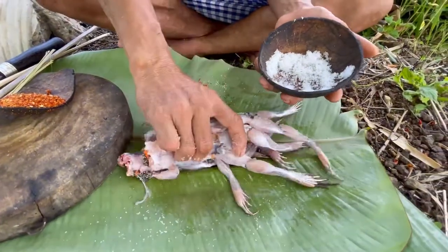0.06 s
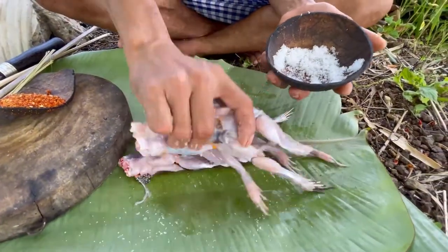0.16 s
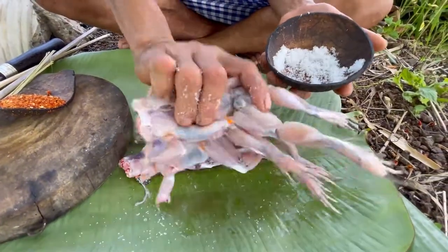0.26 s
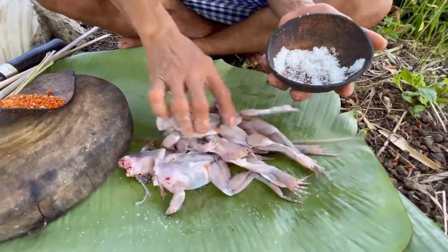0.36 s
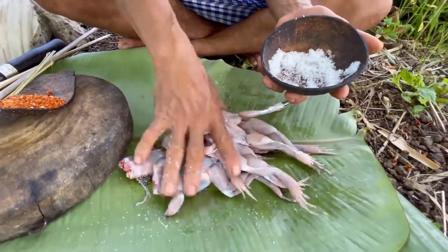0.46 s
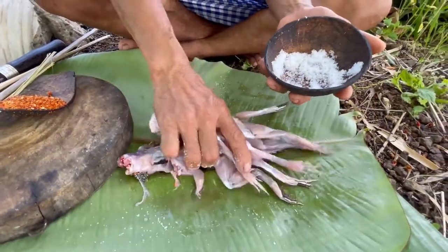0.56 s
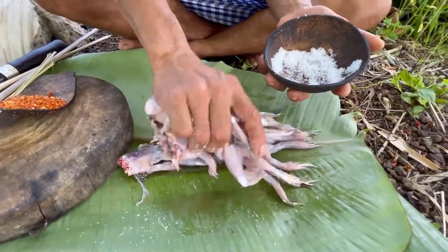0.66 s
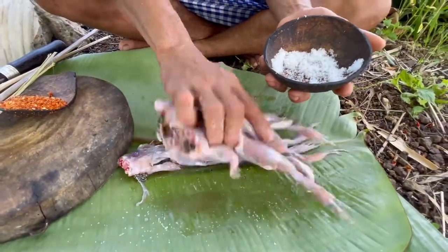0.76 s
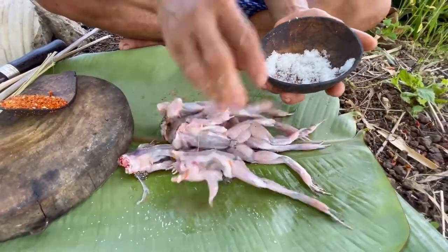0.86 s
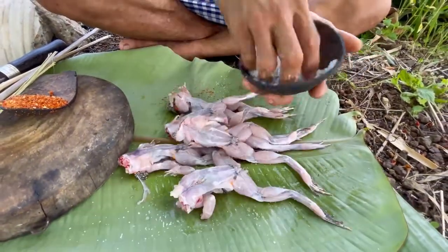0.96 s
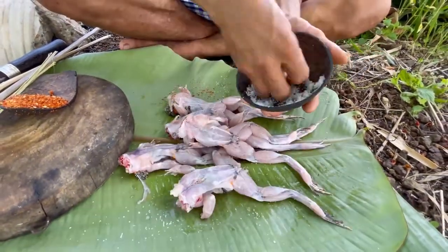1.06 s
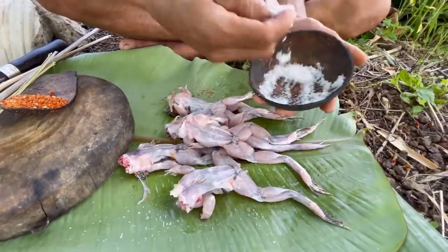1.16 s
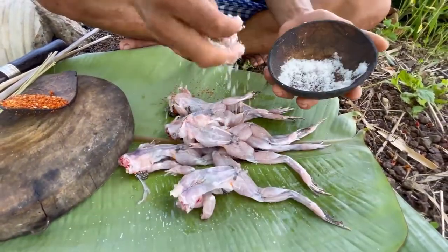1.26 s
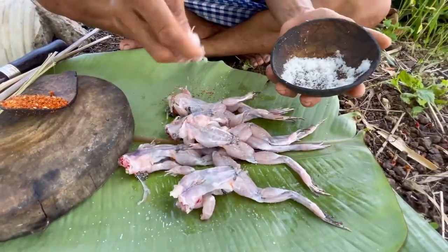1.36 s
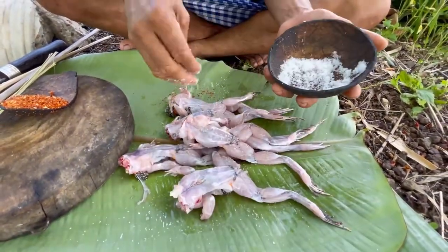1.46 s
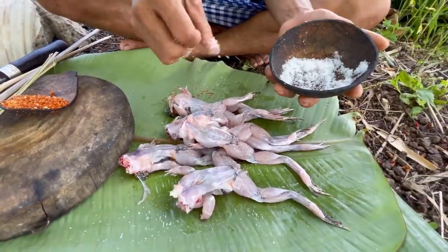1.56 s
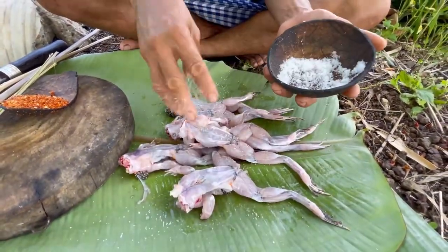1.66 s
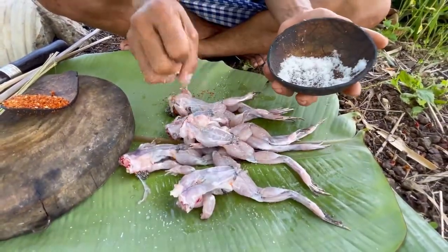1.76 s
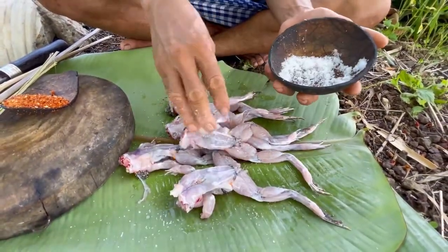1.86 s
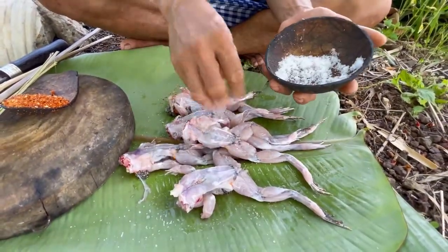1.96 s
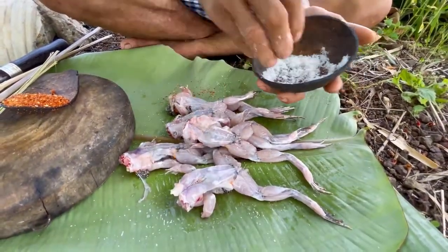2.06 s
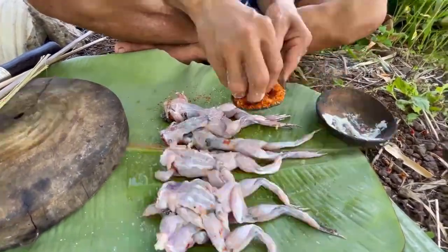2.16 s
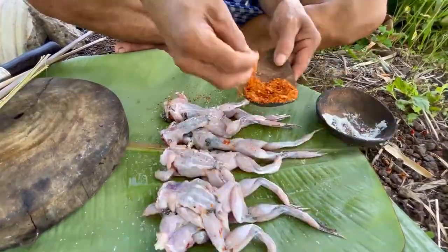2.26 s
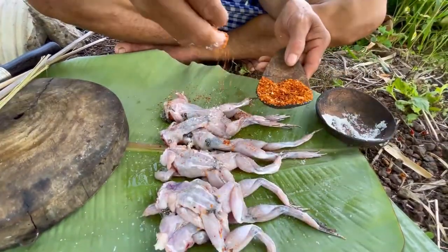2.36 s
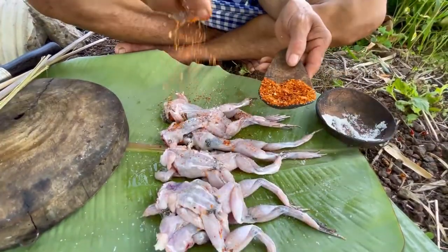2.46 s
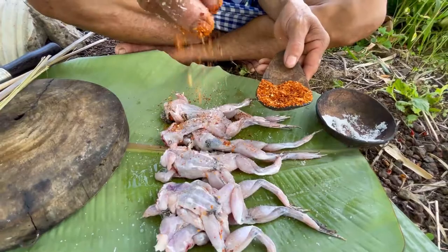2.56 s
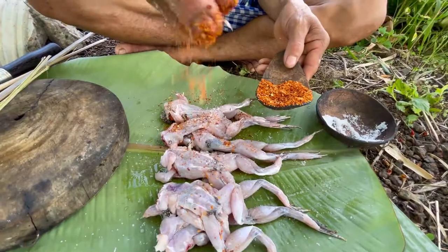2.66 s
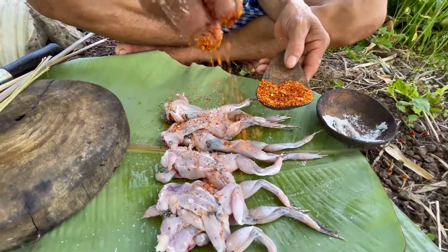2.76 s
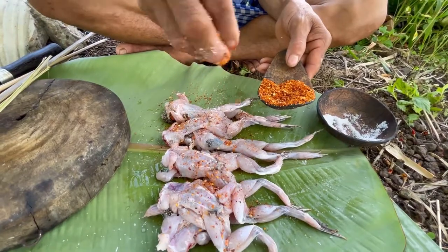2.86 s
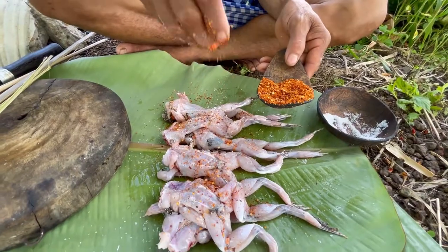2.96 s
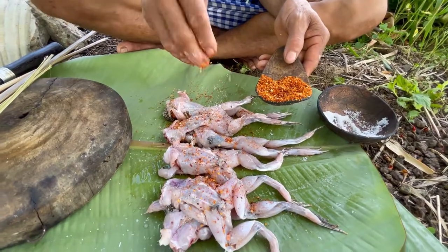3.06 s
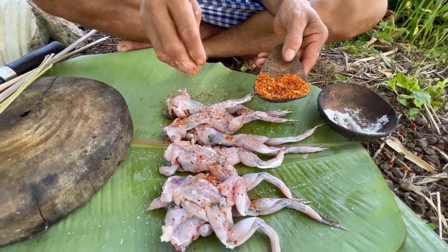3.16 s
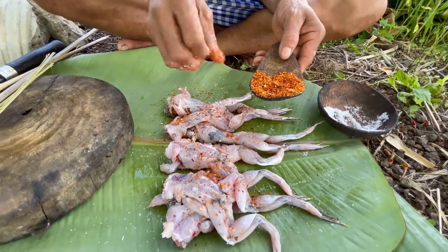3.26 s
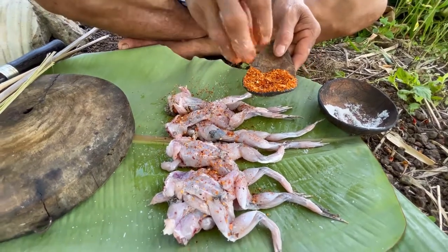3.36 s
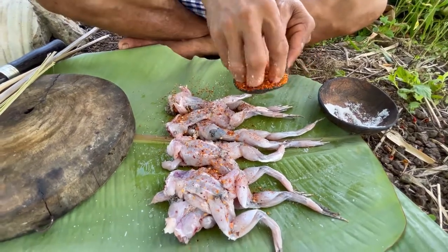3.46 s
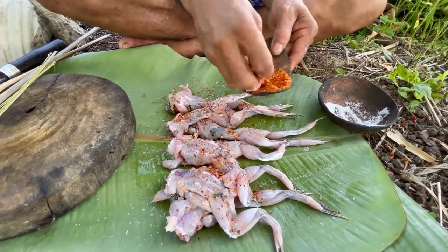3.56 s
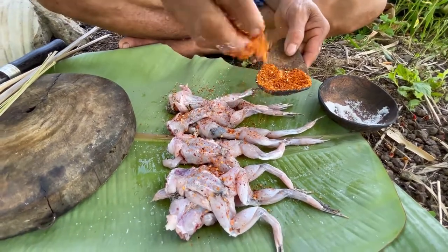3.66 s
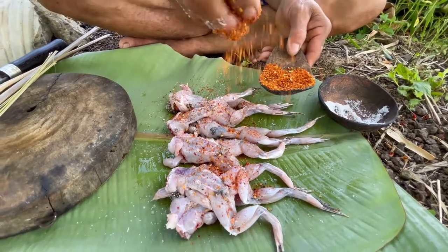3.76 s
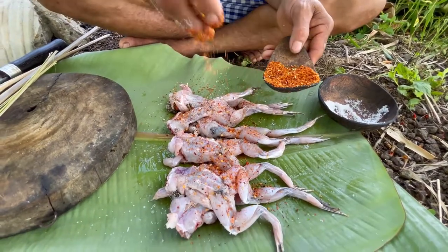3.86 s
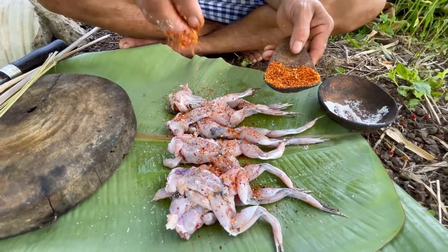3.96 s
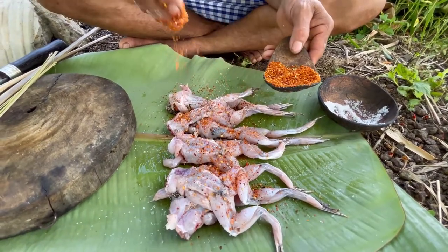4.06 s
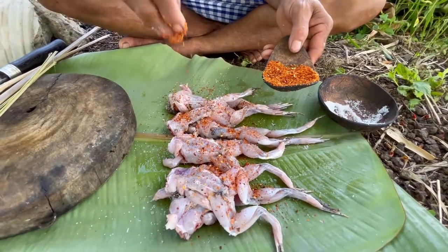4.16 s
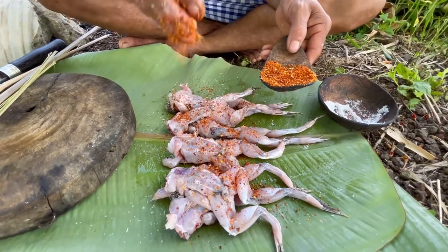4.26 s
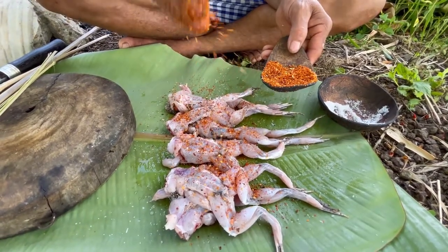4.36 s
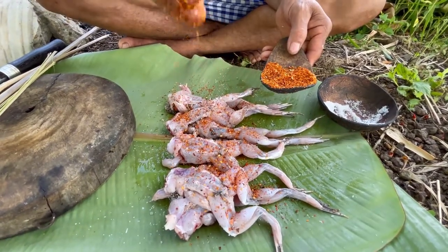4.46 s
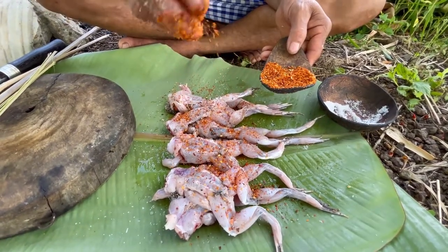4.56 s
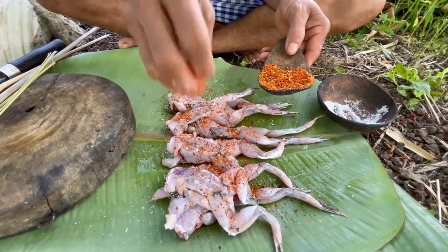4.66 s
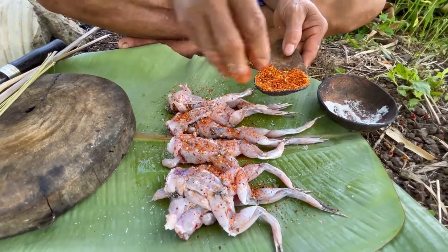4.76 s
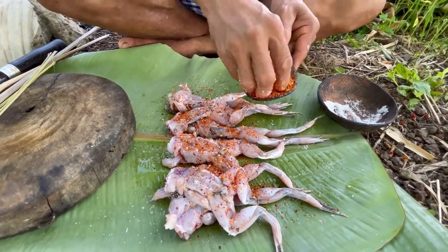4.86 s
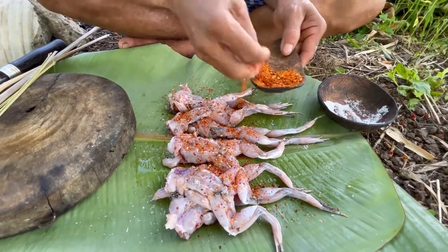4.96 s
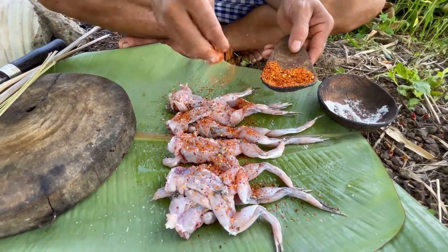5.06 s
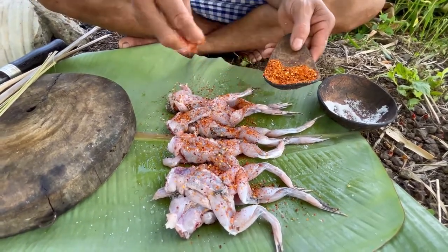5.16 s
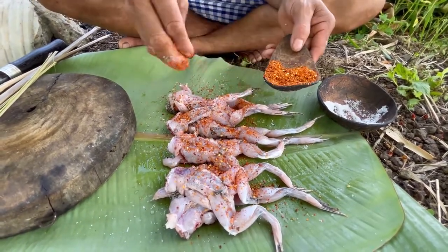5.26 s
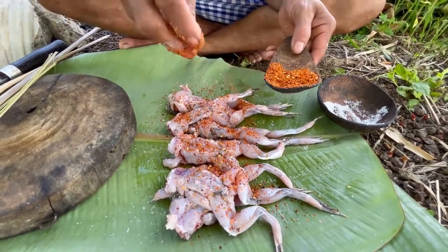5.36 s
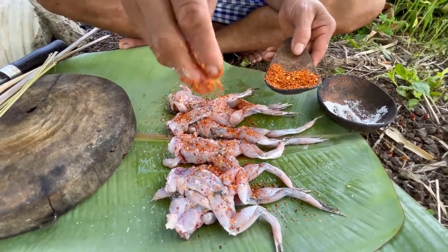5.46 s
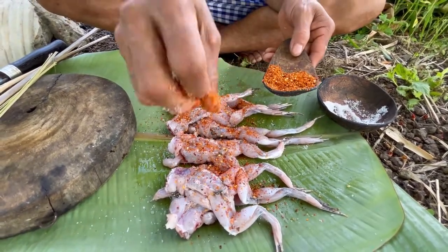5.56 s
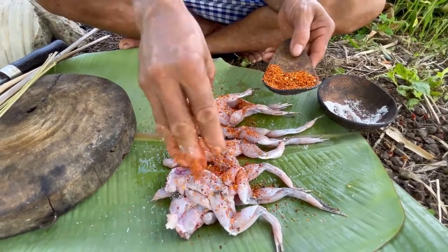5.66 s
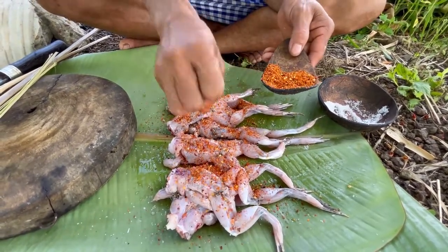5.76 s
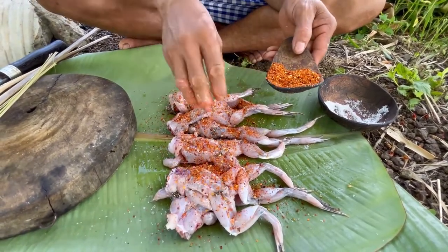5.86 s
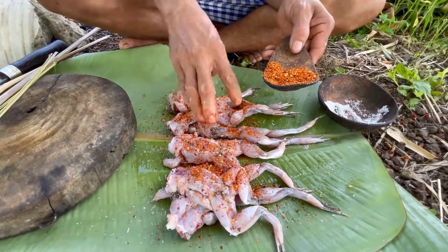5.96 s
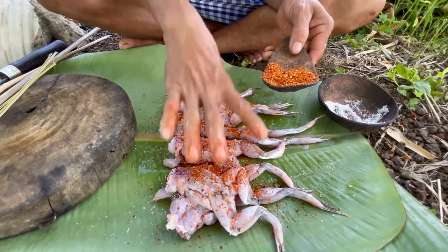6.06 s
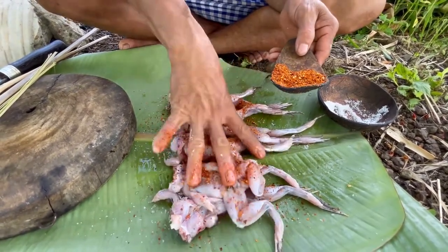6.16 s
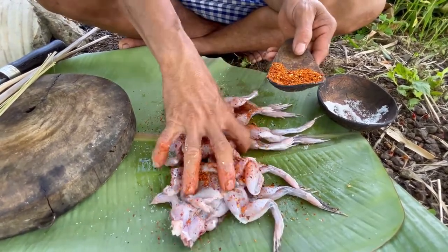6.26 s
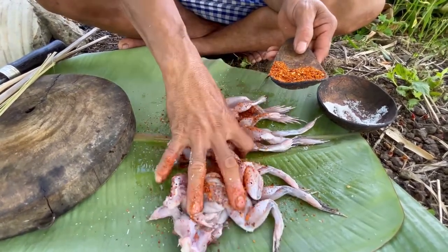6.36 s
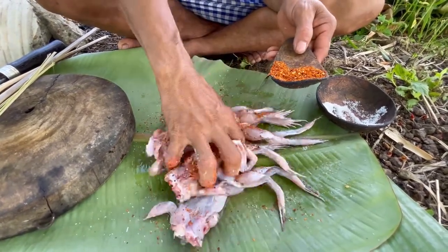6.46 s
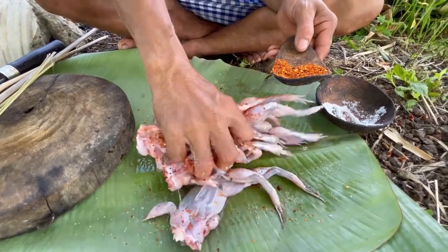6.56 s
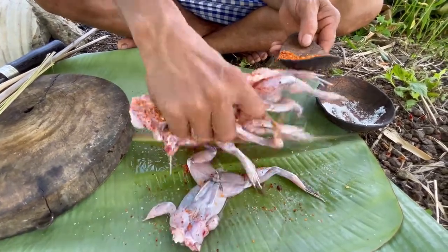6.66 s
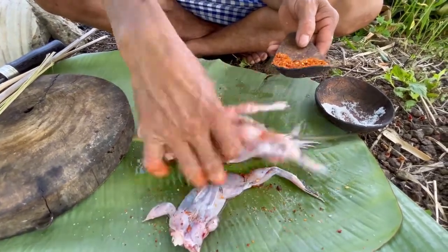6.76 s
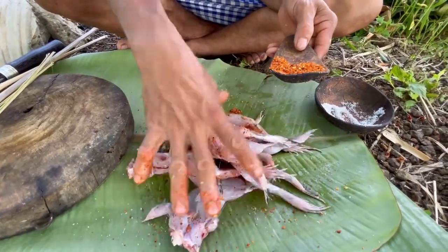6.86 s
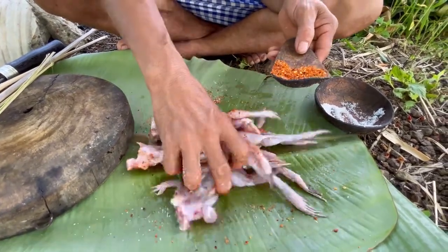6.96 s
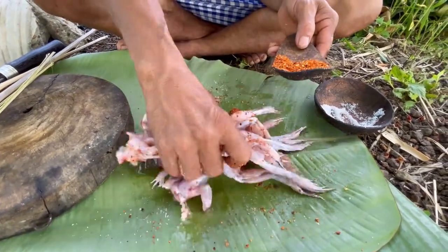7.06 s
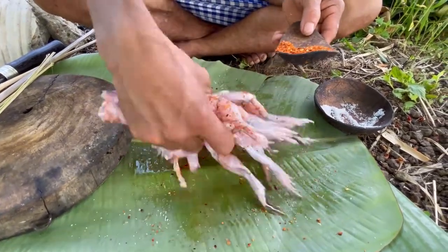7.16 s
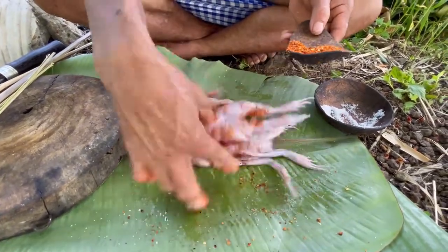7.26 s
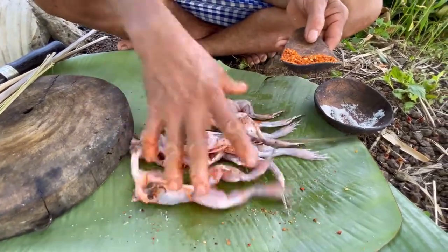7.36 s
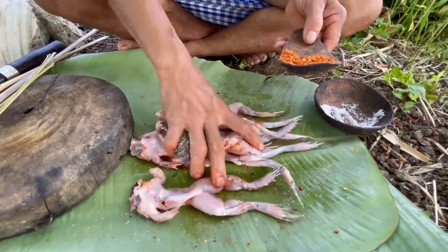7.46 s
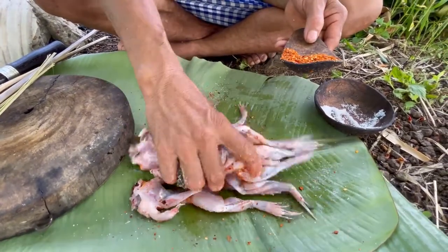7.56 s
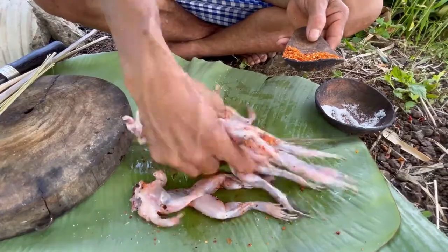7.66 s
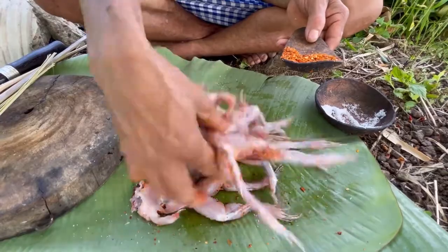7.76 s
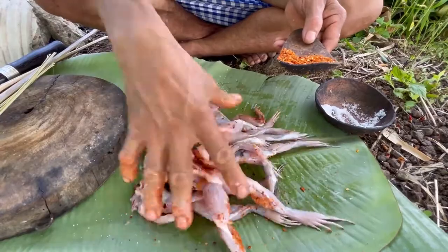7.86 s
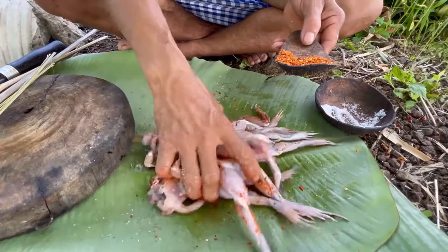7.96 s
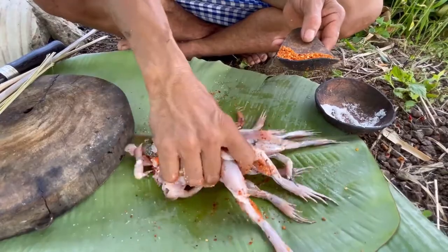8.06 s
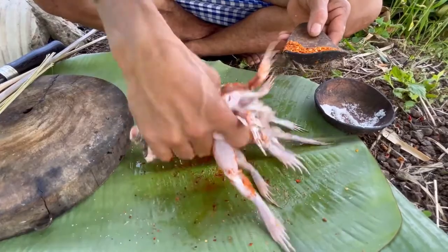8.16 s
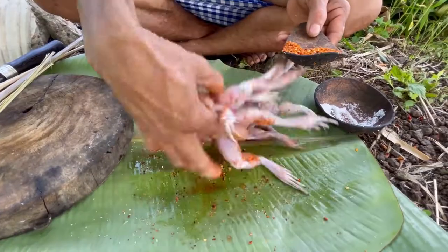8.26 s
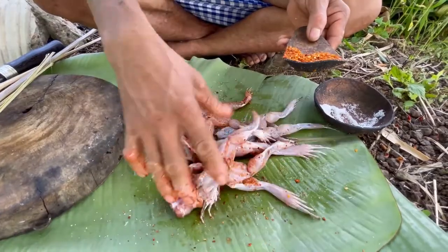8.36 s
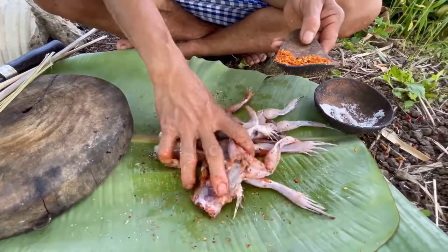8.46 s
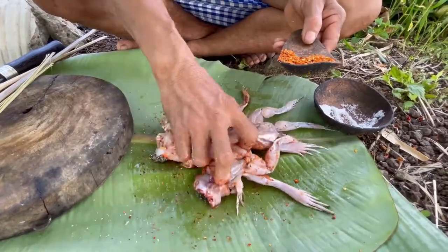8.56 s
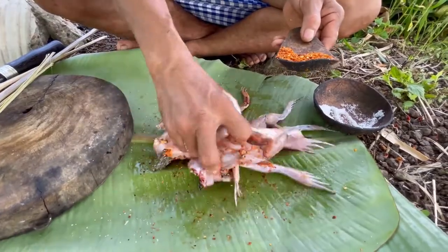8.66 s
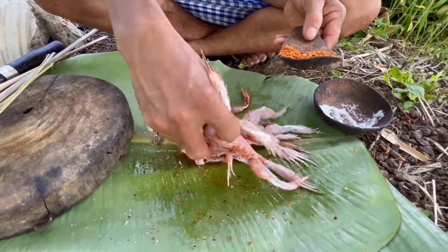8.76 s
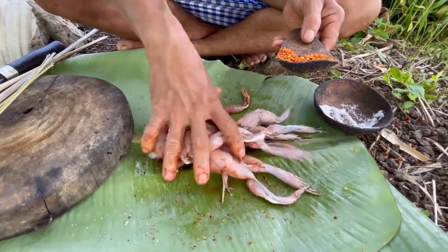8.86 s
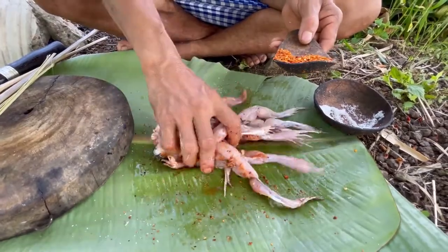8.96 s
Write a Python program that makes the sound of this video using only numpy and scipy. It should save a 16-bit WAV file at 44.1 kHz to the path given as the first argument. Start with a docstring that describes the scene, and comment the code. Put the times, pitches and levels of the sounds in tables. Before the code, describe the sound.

Close outdoor food handling: sticky flesh smacks on a broad leaf, dry salt scrapes, fine pattering flakes, then vigorous wet tossing over faint engine chug.

```python
"""Wet squelches, a splat and a loud pop come first: outdoors, a hand turns raw frogs on a big leaf.
It sprinkles them with salt and chilli flakes, then tosses them again; salt is pinched from a bowl.
Skin, grit and scrapes are crackling coloured noise; air pops are gliding tones; grains are short bursts.
A close two-port microphone hears it over a low filtered-noise rumble and the pulsed chug of a far engine."""
import sys
import numpy as np
from scipy import signal
from scipy.fft import rfft, irfft
from scipy.io import wavfile
from scipy.ndimage import uniform_filter1d

SR = 44100
rng = np.random.default_rng(int(sys.argv[2]) if len(sys.argv) > 2 else 0)


def unload_wav(signal):
    """Save mono or channel-first audio to the path in sys.argv[1] as 16-bit WAV at rate SR, clipped to [-1, 1]."""
    wavfile.write(
        sys.argv[1],
        SR,
        np.round(np.clip(np.atleast_2d(signal).T, -1, 1) * 32767).astype(np.int16),
    )


N = 396900
TIME = np.arange(N) / SR

# All levels are relative, ahead of the echo, the placing and the microphone.
# the hand grips, presses and turns the wet frogs: start_s, length_s, squelch_db, grit_db
GRIPS = [(0.0, .11, -54.5, -49.5), (0.136, 0.11, -58.5, -58), (0.321, .08, -49, -49),
         (0.487, 0.19, -53.5, -48), (0.79, .11, -51, -54), (6.128, 0.12, -52, -48.5),
         (6.235, 0.18, -55, -55.5), (6.399, 0.22, -48, -44), (6.735, 0.12, -47.5, -44),
         (6.913, .21, -47, -43.5), (7.14, 0.33, -55, -50.5), (7.419, 0.3, -48.5, -44),
         (7.775, 0.09, -43.5, -45.5), (7.93, 0.23, -44.5, -43), (8.246, 0.13, -47.5, -43.5),
         (8.444, 0.12, -49, -47), (8.626, .13, -51.5, -47.5), (8.833, 0.45, -49.5, -49.5)]
# the fingers rub a pinch and a shower of salt or flakes falls: start_s, length_s, grit_db
SHOWERS = [(1.334, .11, -56), (1.519, 0.034, -50.5), (1.706, 0.081, -50), (1.851, 0.072, -49),
           (1.923, 0.24, -60.5), (2.327, 0.12, -53.5), (2.475, 0.11, -51), (2.678, 0.051, -54),
           (2.812, 0.098, -50.5), (2.924, 0.06, -63.5), (3.091, 0.16, -53), (3.31, 0.23, -62),
           (3.608, 0.071, -61), (3.711, 0.12, -53.5), (3.84, 0.071, -50.5), (4.105, .025, -56.5),
           (4.373, 0.099, -58), (4.482, 0.065, -52.5), (4.753, 0.046, -60.5), (4.929, 0.094, -62.5),
           (5.06, 0.13, -57.5), (5.207, 0.032, -59.5), (5.359, 0.052, -59.5), (5.69, 0.094, -52.5),
           (5.824, 0.21, -55.5)]
# the largest air pockets popping between wet flesh and leaf: start_s, level_db, nominal pitch_hz
AIR_POPS = [(0.341, -26.5, 1220), (0.3492, -18, 1290), (0.3528, -5, 1750), (0.3728, -20, 1390),
            (0.5089, -31.5, 1580), (0.8289, -22.5, 1510), (0.8398, -22.5, 1700), (0.9806, -28.5, 1980),
            (2.886, -37.5, 1600), (4.4225, -31, 1370), (6.2215, -27.5, 1800), (6.5003, -27, 1680),
            (6.54, -26, 1550), (6.815, -14, 1410), (6.8263, -26, 1100), (7.0522, -19, 1270),
            (7.228, -26.5, 1690), (7.2914, -4, 1820), (7.3039, -12, 1270), (7.3146, -15, 1380),
            (7.4223, -22.5, 1400), (7.5729, -23.5, 1470), (7.5945, -26.5, 2570), (7.635, -25, 2720),
            (7.7681, -25.5, 1190), (7.7923, -22, 1840), (7.848, -23, 1310), (7.8623, -25, 1480),
            (8.2793, -17.5, 2460), (8.311, -17, 1490), (8.3424, -11.5, 1340), (8.3533, -12, 1880),
            (8.9787, -28, 1100)]
# flesh landing on the leaf: start_s, length_s, squelch_db, spray_db
FLESH_SLAPS = [(.338, 0.04, -31, -35.5), (.376, .029, -46, -44), (.824, 0.023, -34.5, -40),
               (.842, 0.02, -42, -43.5), (6.536, 0.0084, -37.5, -40.5), (6.795, 0.045, -38, -43.5),
               (7.050, .0048, -26, -36), (7.293, 0.051, -34, -37), (7.416, 0.011, -35.5, -46),
               (7.766, 0.0062, -35.5, -42), (7.826, 0.044, -40.5, -43), (8.279, .0088, -44.5, -38),
               (8.330, 0.036, -36.5, -36.5), (8.353, 0.0051, -48, -32)]
# the clearest single grains and snaps of the leaf: start_s, level_db, brightness_hz
GRAIN_TICKS = [(0.0864, -36, 10600), (0.0985, -29, 7540), (0.1322, -27, 12400), (0.1577, -32, 7000),
               (0.4758, -42, 10800), (0.6772, -31.5, 11300), (1.013, -33, 11500), (1.3208, -34.5, 8100),
               (1.4749, -39, 8400), (1.534, -38, 11100), (1.6838, -37, 11200), (1.8808, -36, 8500),
               (1.8962, -35.5, 6200), (1.948, -35.5, 12200), (2.1324, -30, 8150), (2.2403, -33.5, 12800),
               (2.286, -33, 10200), (2.4696, -32.5, 10200), (2.7972, -36, 11000), (3.86, -35, 8200),
               (3.8715, -28.5, 9900), (3.981, -38.5, 11300), (4.421, -34, 9700), (4.4743, -31.5, 6300),
               (4.6995, -40, 11700), (5.089, -37, 9100), (5.225, -40.5, 9150), (5.3597, -38, 9100),
               (6.7426, -26.5, 9600), (6.778, -29, 10200), (7.0516, -21, 5900), (7.423, -26, 8700),
               (8.1226, -29, 5370), (8.2798, -28.5, 8500), (8.3529, -31, 9700)]
# dry scrapes, fingers in the salt bowl, the pinch lifted, the bowl put down:
# start_s, length_s, crunch_db, hollow_body_db
BOWL_SCRAPES = [(.979, 0.019, -45.5, -47.5), (.997, 0.026, -43, -48.5), (1.028, 0.042, -36, -48.5),
                (1.068, .043, -38, -55.5), (1.102, .026, -33.5, -63), (1.125, 0.02, -44, -59),
                (1.17, 0.075, -56, -94), (2.156, .05, -37.5, -48.5), (2.168, 0.023, -40, -50.5)]
# dull knocks of hand and flesh against the ground: start_s, level_db, pitch_hz
GROUND_THUDS = [(0.345, -37, 254), (6.665, -40, 95), (6.74, -34.5, 150), (6.762, -34, 119),
                (6.809, -32.5, 132), (7.637, -39, 120), (7.669, -43, 120), (8.335, -36.5, 135)]
# ringing modes of the leaf on the ground: nominal pitch_hz, t60_s, level_db
LEAF_MODES = [(342, 0.034, -32.5), (1016, 0.032, -17), (1475, 0.031, -14), (2850, 0.014, -13.5)]

# a far single-cylinder engine: time_s, firing_rate_hz, hum_db before its waver
ENGINE_COURSE = [(0, 16.8, -60), (1.4, 16.85, -58), (2.1, 16.7, -60), (2.5, 16.22, -66), (4.3, 16.25, -66),
                 (5.0, 16.6, -63), (5.8, 16.25, -65), (9, 16.3, -66)]
# the engine's knocks within one cycle: share_of_cycle (0 to 1), level_db
ENGINE_KNOCKS = [(0, 0), (.31, -7), (.67, -8)]

# wet skin peeling, a spectrum: frequency_hz, level_db
SQUELCH_SPECTRUM = [(200, -28), (500, -6.5), (800, -7.5), (1000, -11), (1150, -6.5), (1430, 1.5),
                    (1750, -2), (2050, -7.5), (2450, -5), (2720, -10), (2900, -7), (3250, -11), (4600, -12),
                    (9000, -48)]
# salt, flakes and wet spray, a spectrum: frequency_hz, level_db
GRIT_SPECTRUM = [(1000, -6.5), (2500, -2), (4200, 1), (6500, 1.5), (8500, -0.5), (11600, 2.5), (14500, 2),
                 (16000, 0.5)]
# a limp body landing, a spectrum: frequency_hz, level_db
SLAP_SPECTRUM = [(40, -34.5), (100, -6.5), (330, -2.5), (550, -5), (900, -4), (1400, -4.5), (2000, -4),
                 (2700, -13), (3800, -6), (5500, -12.5), (10000, -48)]
# coarse dry grains, a spectrum: frequency_hz, level_db
CRUNCH_SPECTRUM = [(2000, -27), (5600, -19), (6600, -4), (8600, -3), (11000, -3.5), (14000, -4),
                   (16000, -6.5)]
# the hollow bowl, a spectrum: frequency_hz, level_db
BOWL_SPECTRUM = [(200, -5), (550, -1), (900, -1), (1400, -2.5), (2100, -4), (2570, 8.5), (3050, 0.5),
                 (4500, -1), (7000, -19)]
# the colour of each engine knock, a spectrum: frequency_hz, level_db
CHUG_SPECTRUM = [(50, -39), (110, 12), (160, 12), (330, 3.5), (480, -0.5), (610, -8.5), (720, -25),
                 (900, -37)]
# the distant rumble, a spectrum: frequency_hz, level_db
RUMBLE_SPECTRUM = [(20, -38), (40, -35), (62, -44), (95, -1), (145, 1), (230, -3.5), (330, -5.5),
                   (450, -14.5), (580, -18), (720, -37.5), (900, -53), (2000, -56)]
# the light draught, a spectrum: frequency_hz, level_db
DRAUGHT_SPECTRUM = [(20, -27), (45, -19.5), (100, -1), (170, -7), (400, -13), (700, -25), (2000, -67)]
# the faint steady hiss, a spectrum: frequency_hz, level_db
HISS_SPECTRUM = [(500, -13), (900, -14.5), (1400, -16), (2200, 2.5), (5700, 1), (8400, -11), (11800, 8),
                 (14800, -1), (16000, -2)]

PORT_LAG = 4  # samples by which the right port trails the left
TOP_HZ = 15850  # upper limit of the microphone's sound
# every grip takes hold quickly, presses hardest halfway and lets go
GRIP_ATTACK_S, GRIP_SWELL_DB, GRIP_RELEASE_S = 0.012, 4, 0.041
# every shower thickens and trails off; its share in the squelch layer is this much below its grit
SHOWER_ATTACK_S, SHOWER_SWELL_DB, SHOWER_RELEASE_S, SHOWER_LEAF_DB = 0.0096, 5.5, 0.0076, -9.5
# sticky fingers never rest entirely
IDLE_SQUELCH_DB, IDLE_GRIT_DB = -78, -64


def undb(db):
    """Decibels to amplitude gain."""
    return 10 ** (np.asarray(db) / 20)


def unit(x):
    """Scale to rms 1."""
    return x / np.sqrt(np.mean(x ** 2))


def colour(x, spectrum):
    """Filter a sound by a spectrum drawn over log frequency, then scale to rms 1."""
    hz, db = np.transpose(spectrum)
    f = np.maximum(np.fft.rfftfreq(N, 1 / SR), 1)
    gain = undb(np.interp(np.log(f), np.log(hz), db))
    return unit(irfft(rfft(x) * gain, N))


def add(track, start, sound):
    """Mix a sound into a track from a start time in seconds."""
    i = max(int(start * SR), 0)
    part = track[..., i:i + sound.shape[-1]]
    part += sound[..., :part.shape[-1]]


def ports(likeness):
    """Noise at two ports that share a part of its power; the left one hears that part first."""
    shared = rng.standard_normal(N)
    own = rng.standard_normal((2, N))
    arrivals = np.array([shared, np.roll(shared, PORT_LAG)])
    return np.sqrt(likeness) * arrivals + np.sqrt(1 - likeness) * own


def crackle(rate, spread_db, decay_s):
    """Envelope of many tiny breaks per second, uneven in size, dying quickly; steady on average."""
    struck = rng.random(N) < rate / SR
    hits = struck * undb(spread_db * np.minimum(rng.exponential(size=N), 4))
    power = signal.lfilter([1], [1, -np.exp(-1 / (decay_s * SR))], hits ** 2) + 1e-9
    average = uniform_filter1d(power, size=2205)  # over 50 ms
    return np.sqrt(power / (average + 1e-6))


def strokes(rows, edge):
    """Two level envelopes from rows of (start, length, dB, dB), each stroke with rounded ends."""
    out = np.zeros((2, N))
    for start, length, *db in rows:
        add(out, start, undb(db)[:, None] * signal.windows.tukey(int(length * SR), edge))
    return out


def rubbing():
    """Wet skin peels off the leaf in tiny smacks while salt and flakes grind and patter on it."""
    squelch_db, grit_db = handwork()
    peel = crackle(rate=330, spread_db=3.4, decay_s=0.003)
    grind = crackle(rate=970, spread_db=2.5, decay_s=0.0032)
    squelch = colour(ports(likeness=0.66) * peel, SQUELCH_SPECTRUM) * undb(squelch_db)
    # a slip of the skin also drags the grit that lies under it
    dragged = np.hypot(grind, 0.5 * peel)
    grit = colour(ports(likeness=0.05) * dragged, GRIT_SPECTRUM) * undb(grit_db)
    # larger pockets of air and single flakes stand out from the wash
    smacks = scatter(rate=110, level_db=squelch_db + 9, spread_db=3.2, hz=1850, octaves=0.6)
    flake_db = np.minimum(grit_db + 8.5, -48)
    flakes = scatter(rate=42, level_db=flake_db, spread_db=3.8, hz=8500, octaves=0.8)
    return squelch + grit + pops(smacks) + ticks(flakes)


def handwork():
    """Levels of squelch and grit in dB, as the powers of grips and showers add to the idle fingers."""
    power = np.zeros((2, N)) + undb([[IDLE_SQUELCH_DB], [IDLE_GRIT_DB]]) ** 2
    for start, length, *db in GRIPS:
        grip = gesture(length, GRIP_ATTACK_S, GRIP_SWELL_DB, GRIP_RELEASE_S)
        add(power, start, (undb(db)[:, None] * grip) ** 2)
    for start, length, db in SHOWERS:
        shower = gesture(length, SHOWER_ATTACK_S, SHOWER_SWELL_DB, SHOWER_RELEASE_S)
        add(power, start, (undb([[db + SHOWER_LEAF_DB], [db]]) * shower) ** 2)
    return 10 * np.log10(power)


def gesture(length, attack_s, swell_db, release_s):
    """Envelope of one move of the hand: a quick start, an arch of effort, a dying end."""
    t = TIME[:int((length + 6 * release_s) * SR)]
    attack = np.minimum(t / attack_s, 1)
    arch = np.sin(np.pi * np.minimum(t / length, 1))
    release = np.exp(-np.maximum(t - length, 0) / release_s)
    return attack * undb(swell_db * (arch - 0.5)) * release


def scatter(rate, level_db, spread_db, hz, octaves):
    """Chance events as rows (s, dB, Hz): mostly small, a few large, all following a level curve."""
    when, size, pitch = rng.random((int(rate * N / SR), 3)).T
    i = (when * N).astype(int)
    event_db = level_db[i] - spread_db * np.log(0.038 + size)
    event_hz = hz * 2 ** (octaves * (2 * pitch - 1))
    return np.transpose([i / SR, event_db, event_hz])


def pops(rows, rise_s=0.00052, glide=0.53, glide_s=0.0005, sag=0.19):
    """A pocket of air opens: a brief tone falls in pitch while the leaf rings."""
    out, t = np.zeros(N), TIME[:1024]
    swell = (t / rise_s * np.exp(1 - t / rise_s)) ** 4.0
    # the pitch starts above nominal and settles below it
    bend = 1 + glide * np.exp(-t / glide_s) - sag
    detunes = rng.standard_normal((len(rows), len(LEAF_MODES)))
    for (start, db, hz), detune in zip(rows, detunes):
        pop = swell * np.sin(2 * np.pi * np.cumsum(hz * bend) / SR)
        ring = np.zeros(len(t))
        for (mode_hz, t60, mode_db), d in zip(LEAF_MODES, detune):
            decay = np.exp(-np.log(1000) * t / t60)
            ring += undb(mode_db) * decay * np.sin(2 * np.pi * mode_hz * (1 + 0.018 * d) * t)
        add(out, start, undb(db) * (pop + ring))
    return np.array([out, np.roll(out, PORT_LAG)])


def slaps():
    """Limp bodies land limb by limb: a dense splat, with a fine wet spray that swells inside it."""
    body = strokes(FLESH_SLAPS, edge=0.22)[0]
    spray = strokes(FLESH_SLAPS, edge=0.32)[1]
    contact = crackle(rate=780, spread_db=4.5, decay_s=0.0019)
    splat = colour(ports(likeness=0.69) * contact, SLAP_SPECTRUM) * body
    return splat + colour(ports(likeness=0.024) * contact, GRIT_SPECTRUM) * spray


def ticks(rows, decay_s=0.0015, rise_s=0.00004, octaves=0.7, knock=0.7, knock_hz=1700):
    """Each grain gives a millisecond burst around its own brightness and knocks the leaf."""
    out, t = np.zeros((2, N)), TIME[:512]
    f = np.maximum(np.fft.rfftfreq(len(t), 1 / SR), 1)
    shape = (1 - np.exp(-t / rise_s)) * np.exp(-t / decay_s)
    leaf = knock / (1 + (2 * np.log2(f / knock_hz)) ** 2)
    for start, db, hz in rows:
        band = 1 / (1 + (np.log2(f / hz) / octaves) ** 2)
        noise = rng.standard_normal((2, len(t)))
        burst = unit(irfft(rfft(noise) * (band + leaf)))
        add(out, start, undb(db) * burst * shape / shape.max())
    return out


def scrapes():
    """Coarse dry grains crunch brightly and stir the hollow bowl."""
    crunch_level, body_level = strokes(BOWL_SCRAPES, edge=0.13)
    grains = crackle(rate=2800, spread_db=0.0, decay_s=0.00078)
    crunch = colour(ports(likeness=0.12) * grains, CRUNCH_SPECTRUM) * crunch_level
    return crunch + colour(ports(likeness=0.89) * grains, BOWL_SPECTRUM) * body_level


def thuds(length_s=0.021):
    """The soil under the leaf gives a few soft, low cycles."""
    out, swell = np.zeros(N), np.hanning(int(length_s * SR))
    for start, db, hz in GROUND_THUDS:
        add(out, start, undb(db) * swell * np.sin(2 * np.pi * hz * TIME[:len(swell)]))
    return out


def surroundings(x, echo_db=-15, t60_s=0.081):
    """Ground, legs and chopping block scatter a weak, very short echo, different at each port."""
    t = TIME[:2048]
    build_up = 1 - np.exp(-t / 0.0029)
    tail = rng.standard_normal((2, len(t))) * build_up * np.exp(-np.log(1000) * t / t60_s)
    tail = unit(tail) / np.sqrt(len(t))
    return x + undb(echo_db) * signal.fftconvolve(x, tail, axes=1)[:, :N]


def motor(hum_order=19, chug_db=-57.5):
    """Only the low chug of a far engine carries: uneven knocks, with one wavering partial that hums."""
    s, *columns = np.transpose(ENGINE_COURSE)
    hz, hum_db = (np.interp(TIME, s, c) for c in columns)
    cycles = np.cumsum(hz) / SR
    beats = np.zeros(N)
    for share, db in ENGINE_KNOCKS:
        # one impulse whenever the cycle passes this share
        count = np.floor(cycles - share)
        beats += undb(db) * np.diff(count, prepend=np.floor(cycles[0] - share))
    chug = colour(beats * undb(2 * rng.standard_normal(N)), CHUG_SPECTRUM)
    knots = np.linspace(0, TIME[-1], 40)
    waver_db = 1.2 * np.interp(TIME, knots, rng.standard_normal(len(knots)))
    hum = undb(hum_db + waver_db) * np.cos(2 * np.pi * hum_order * cycles)
    return chug * undb(chug_db) + hum


def outdoors():
    """Filtered noise: a distant rumble alike at both ports, a light draught on each, a faint steady hiss."""
    far = colour(rng.standard_normal(N), RUMBLE_SPECTRUM) * undb(-52.5)
    draught = colour(rng.standard_normal((2, N)), DRAUGHT_SPECTRUM) * undb(-58)
    hiss = colour(ports(likeness=0.067), HISS_SPECTRUM) * undb(-62)
    return far + draught + hiss


def scene(left_db=2.5, leaf_low_hz=110):
    """The work goes on a little left of the microphone; the thin leaf radiates little bass."""
    near = surroundings(rubbing() + slaps() + pops(AIR_POPS) + ticks(GRAIN_TICKS) + scrapes())
    thin_leaf = signal.butter(2, leaf_low_hz, "high", fs=SR, output="sos")
    near = signal.sosfilt(thin_leaf, near) + thuds()
    # the level difference is split between the ports
    placed = near * undb(np.array([[left_db], [-left_db]]) / 2)
    return placed + motor() + outdoors()


def record(dry, low_hz=48, narrow=0.097, narrow_hz=9500):
    """The microphone is narrower in the top octave; the recorder rolls off deep bass and cuts the top."""
    side = dry - dry.mean(axis=0)
    treble = signal.butter(2, narrow_hz, "high", fs=SR, output="sos")
    heard = dry - narrow * signal.sosfiltfilt(treble, side)
    lean = signal.sosfilt(signal.butter(2, low_hz, "high", fs=SR, output="sos"), heard)
    return signal.sosfilt(signal.ellip(10, 0.2, 70, TOP_HZ, fs=SR, output="sos"), lean)


dry = scene()
out = record(dry)
unload_wav(out)
```